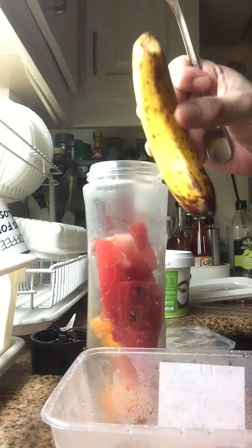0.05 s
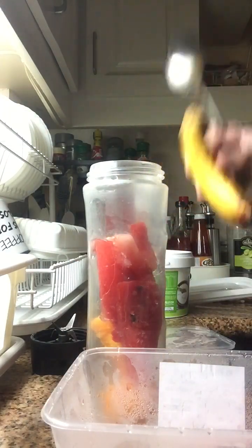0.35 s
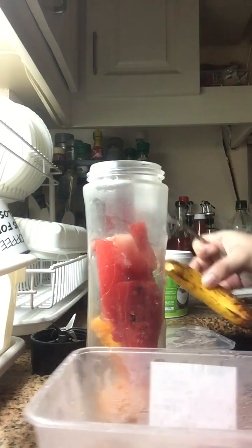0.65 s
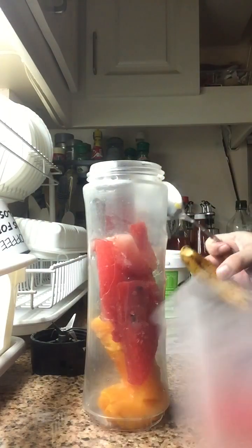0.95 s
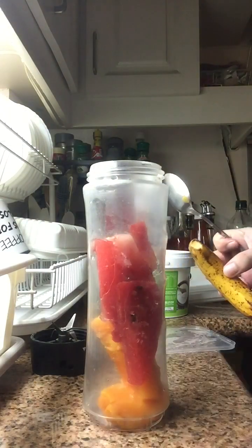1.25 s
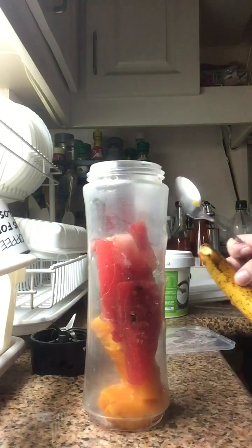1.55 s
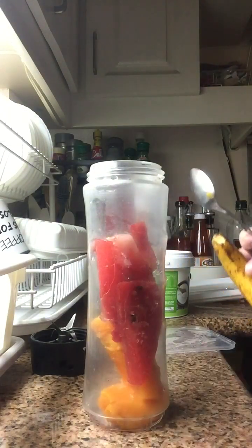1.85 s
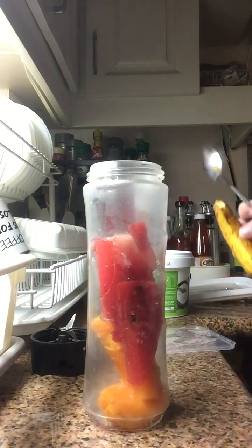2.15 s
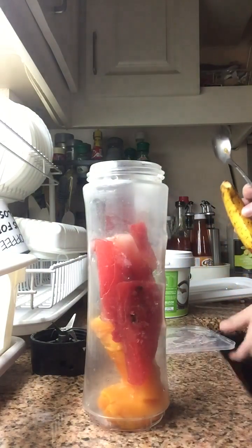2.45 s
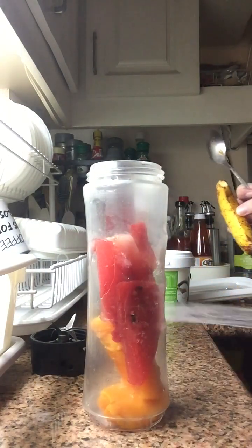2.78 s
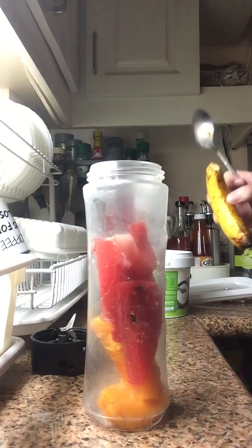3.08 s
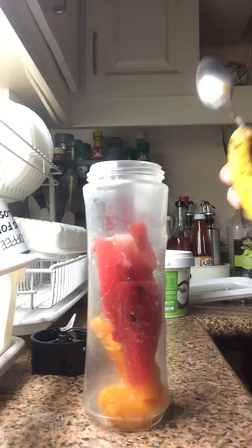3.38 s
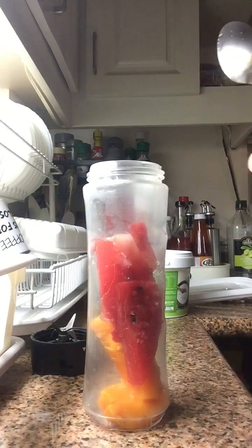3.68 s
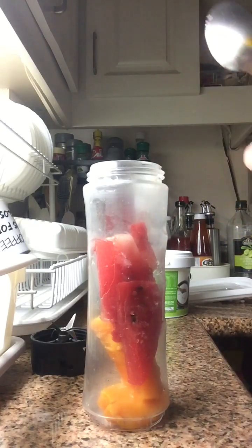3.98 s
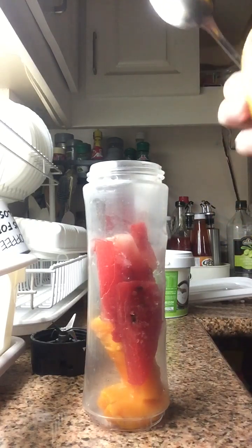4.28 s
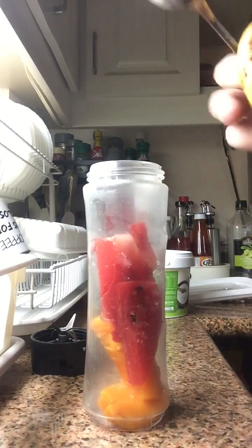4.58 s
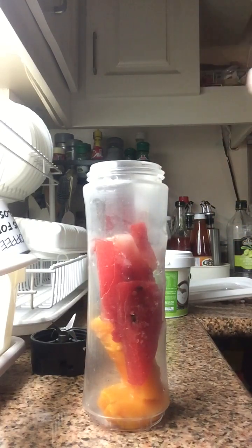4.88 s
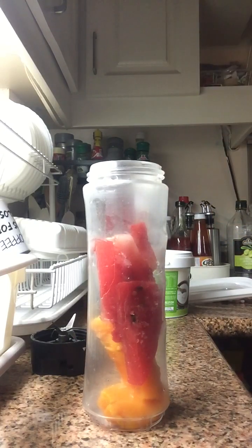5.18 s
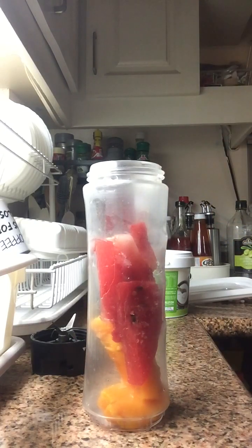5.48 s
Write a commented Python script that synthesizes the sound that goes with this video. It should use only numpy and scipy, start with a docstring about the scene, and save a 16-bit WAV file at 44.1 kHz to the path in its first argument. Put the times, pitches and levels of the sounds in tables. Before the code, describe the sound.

Close plastic scuffs, small clicks and dull knocks on a kitchen counter, then a drawer rasping shut and a few more knocks.

```python
"""A plastic tub scuffs over a kitchen worktop, close by, and squeaks by stick-slip friction.
A spoon and a banana tick and smack in one hand; things are put down with dull knocks that excite
the worktop's modes. Further off a drawer rasps along its runners and bumps home; the cabinet booms.
An appliance hums at first, over a low stir of handling and the faint hiss of the room."""
import sys
import numpy as np
from scipy import signal
from scipy.fft import rfft, irfft, next_fast_len
from scipy.io import wavfile

SR = 44100
rng = np.random.default_rng(int(sys.argv[2]) if len(sys.argv) > 2 else 0)


def wrap_up_sound(samples):
    """Save the sound to the file named by the first command line argument, as 16-bit audio."""
    columns = np.atleast_2d(samples).T
    # keep every value between -1 and 1, then stretch to whole-number steps
    tamed = np.clip(columns, -1, 1)
    steps = np.round(tamed * 32767).astype(np.int16)
    wavfile.write(sys.argv[1], SR, steps)


N = 243873
TIME = np.arange(N) / SR

# the tub rubs over the worktop: start_s, level_db, rise_s, t60_s, centre_hz, breadth_octaves
TUB_RUBS = [(0.024, -46, 0.029, 0.39, 2560, .8), (0.28, -61, 0.13, 0.52, 2580, 0.82),
            (0.470, -43, 0.024, 0.36, 1450, 1.34), (0.65, -61, 0.098, 1.0, 3000, 2.5),
            (0.831, -57.5, 0.065, 0.11, 3200, 3.9)]
# resonances and hollows of the tub: centre_hz, width_hz, boost_db
TUB_PEAKS = [(332, 74, 15), (581, 37, 12), (666, 280, -2.5), (1110, 70, -8), (3400, 300, 4.5)]
# harmonics 1 to 6 of the squeak: relative_db
SQUEAK_HARMONICS = [-5.5, -4.5, -5, -9, -19, -31]
# things put down: start_s, clatter_db, t60_s, tilt_db_per_octave, worktop_db, note_hz, note_db
KNOCK_EVENTS = [(0.881, -52.5, 0.14, -2.5, -58, 775, -41.5), (0.907, -43.5, 0.081, .5, -70, 1116, -35),
                (0.945, -50.5, 0.17, -3.5, -71, 873, -48), (1.048, -47, 0.1, 2.5, -64, 374, -45),
                (1.2654, -44.5, 0.081, -3.5, -52, 1560, -39), (1.274, -46, 0.13, -2.5, -52, 339, -28),
                (1.2938, -28.5, 0.036, 1.8, -51, 1172, -23.5), (1.300, -45.5, 0.26, 1.5, -62, 3210, -40),
                (1.358, -47, .09, 2.5, -56, 262, -36), (1.381, -65, 0.37, 10.5, -67, 5700, -61),
                (1.454, -43, 0.17, 0, -52.5, 975, -38), (1.757, -37, 0.26, 2, -39, 350, -23),
                (1.764, -32.5, .2, -1.5, -39.5, 552, -26), (3.7, -44.5, 0.2, -0.2, -39, 928, -29),
                (3.837, -44.5, .2, 5, -51, 2415, -39), (4.045, -56, .22, 0, -50, 1450, -53),
                (4.063, -50, 0.17, -3, -50.5, 766, -38.5), (4.184, -53.5, 0.23, 4.5, -48.5, 348, -36.5),
                (4.224, -62, 0.14, -4.5, -87, 348, -37)]
# spectrum shared by all knocks, a value per clatter band: relative_db
KNOCK_BANDS = [1, -0.5, -2, -0.5, -7.5, -11.5]
# edges of the six clatter bands: edge_hz
BAND_EDGES = np.array([40, 250, 700, 1600, 4000, 8000, 16000])
# modes of the worktop and what stands on it: pitch_hz, relative_db, t60_s
WORKTOP_MODES = [(145, -15, 0.14), (225.9, 7.5, 0.24), (348, 1, 0.12), (545.4, -8, 0.33),
                 (860.4, 0.5, 0.25), (900, -24.5, 0.38), (1567, -11, 0.35), (1840, -52, 0.17),
                 (1930, -5, 0.06), (2370, -12, .16), (3270, -14.5, 0.23)]
# hollows between those modes: centre_hz, width_hz, boost_db
WORKTOP_HOLLOWS = [(281, 27, -4.5), (483, 103, -6.5), (680, 110, 0.5), (1074, 200, -7.5), (2580, 870, -6)]
# soft heavy contacts: start_s, peak_db, pitch_hz
THUMP_EVENTS = [(1.06, -35, 120), (1.2721, -13, 113), (1.303, -19.5, 122.6), (1.461, -29, 96),
                (1.764, -25, 85), (1.921, -36.5, 94), (1.971, -39, 92.5), (3.018, -39, 72),
                (3.699, -21, 145), (4.063, -35.5, 94), (4.188, -36, 138), (4.877, -49.5, 109),
                (4.978, -48, 97)]
# ticks of fruit, spoon and plastic, and the drawer's latch cracking as it bumps home: start_s, peak_db,
# pitch_hz, quality_factor
TICK_EVENTS = [(0.733, -38, 4950, 0.89), (0.744, -43, 7000, 1), (0.908, -38.5, 1800, 1.1),
               (0.914, -32.5, 3400, 1.8), (0.924, -45, 3600, .8), (1.0388, -36, 6200, 1.8),
               (1.047, -32.5, 6200, 1), (1.055, -25, 2020, 5.1), (1.089, -26, 5700, 3),
               (1.069, -42, 4540, 1.3), (1.105, -34, 2740, 1.9), (1.146, -40, 2160, 16),
               (1.1761, -25, 7540, 1.6), (1.206, -38, 2660, 9.1), (1.361, -39, 6000, 4),
               (1.381, -28, 6300, 1.5), (1.438, -34, 6200, 3.5), (1.914, -44.5, 3680, 20),
               (2.6596, -9.5, 4500, 0.38), (3.012, -47, 1490, 18), (3.702, -26.5, 3730, 0.5),
               (4.0645, -45, 920, 2.1)]
# spells of crackling grit and peel: start_s, end_s, level_db
CRACKLE_SPELLS = [(0.6, 1.066, -49.5), (1.33, 1.537, -54)]
# spectra of the rolling drawer's rumble, rasp and hiss: frequency_hz, relative_db
RUMBLE_SPECTRUM = [(18, -50), (30, -65), (49, -2.5), (81, -17.5), (97, -11), (113, -37.5), (146, -9),
                   (270, -31.5), (300, -22), (390, -52), (660, -120)]
RASP_SPECTRUM = [(130, -43), (220, -4.5), (273, -4), (355, 0), (475, -15), (567, -4), (612, -14),
                 (829, -13.5), (1370, -9), (2330, -6.5), (2820, -9.5), (4330, -11.5), (4500, -23),
                 (5850, -65), (9900, -120)]
HISS_SPECTRUM = [(2240, -52), (3800, -13), (4390, -23), (4690, -1.5), (5480, -5), (8310, -15),
                 (9710, -12.5), (10500, -18.5), (16000, -31)]
# resonances and hollows of the drawer: centre_hz, width_hz, boost_db
DRAWER_PEAKS = [(96, 22, -7), (120, 14, 8), (181, 18, 4.5), (243, 40, 8.5), (345.6, 39, 11.5),
                (431, 17, 10), (492, 37, -1), (567.6, 14, 13), (746, 590, -9), (1150, 25, 8), (1300, 86, 3),
                (1470, 110, 3.5), (1670, 23, 6.5), (1850, 40, 4), (2014, 67, 4.5), (2350, 17, 6),
                (2760, 130, 3), (4370, 51, 6), (6200, 900, 1.5), (7800, 1400, -2.5), (11100, 1200, 8.5)]
# the drawer's bump, a value per clatter band: level_db
BUMP_BANDS = [-25.5, -29, -24.5, -29, -33, -42.5]
# spectra of the cabinet's boom, the stir of handling and the room hiss: frequency_hz, relative_db
BOOM_SPECTRUM = [(25, -2), (48, 0.5), (72, 8.5), (95, -10), (122, 3.5), (170, -9.5), (300, -62)]
STIR_SPECTRUM = [(25, -6), (60, -2.5), (110, 11), (200, -2), (500, -19), (1500, -12), (5000, -31.5),
                 (15000, -43.5)]
AIR_SPECTRUM = [(15, -63), (25, -17), (45, -12.5), (117, -3), (180, -6), (200, -12.5), (236, -6),
                (384, -15.5), (427, -9), (476, -18), (734, -21), (1440, -20), (2280, -25), (7110, -34),
                (16000, -33)]
# peaks in the room hiss: centre_hz, width_hz, boost_db
AIR_PEAKS = [(1450, 215, 7), (2970, 29, 10.5), (3300, 100, 0), (6300, 3800, 4), (8070, 1800, 3.5)]
# reverberation time, set by absorption at the walls: frequency_hz, t60_s
ROOM_DECAY = [(100, 1.0), (400, 0.92), (2000, 0.45), (6000, 0.19), (14000, 0.32)]
# microphone response: frequency_hz, gain_db
MIC_RESPONSE = [(4300, -1), (4900, -5.5), (5600, -1.5), (6700, -1.0), (7400, -2.5), (8500, -5.5),
                (9600, -3.5), (10200, -9), (11300, -5.5), (12500, -6.0), (15500, -8)]

BAND_HZ = np.sqrt(BAND_EDGES[1:] * BAND_EDGES[:-1])


def tub_scuffs():
    """Sliding friction: plastic on stone makes grainy noise, coloured by the tub's resonances."""
    out = np.zeros(N)
    edge_db = -7   # one breadth away from the centre
    for start, db, rise, t60, centre_hz, breadth in TUB_RUBS:
        band_db = db + edge_db * (np.log2(BAND_HZ / centre_hz) / breadth) ** 2
        add(out, start, clatter(rise, t60, band_db, grain_db=2, damping_hz=8900, peaks=TUB_PEAKS))
    return out


def tub_squeak():
    """Stick-slip oscillation: the tub grips and lets go almost periodically, in a hoarse rising tone."""
    start_s, end_s, start_hz, glide_hz_per_s = 0.30, 0.47, 1032, 1600
    hz = start_hz + glide_hz_per_s * (np.clip(TIME, start_s, end_s) - start_s)
    phase = wavering_phase(hz, jitter=0.032, rate_hz=700)
    squeak = 0
    for harmonic, db in enumerate(SQUEAK_HARMONICS, 1):
        flutter = from_db(db + 0.6 * drift(16))
        rasp = 1 + 0.65 * drift(350)
        squeak = squeak + flutter * rasp * np.sin(harmonic * phase)
    return from_db(-55) * during(start_s, end_s) * rms_one(squeak)


def knocks():
    """Impact excites free vibration: a short clatter, the thing's own note and the worktop's modes."""
    out, t = np.zeros(N), TIME[:SR // 2]
    octaves_up = np.log2(np.minimum(BAND_HZ, 3000) / 1000)   # the tilt levels off above 3 kHz
    for start, clatter_db, t60, tilt, worktop_db, note_hz, note_db in KNOCK_EVENTS:
        rise = 0.0044 * (t60 / 0.2) ** 1.53   # a drier knock also starts more sharply
        band_db = clatter_db + np.array(KNOCK_BANDS) + tilt * octaves_up
        contact = clatter(rise, t60, band_db, grain_db=-0.5, damping_hz=14900, peaks=WORKTOP_HOLLOWS)
        add(out, start, contact)
        ring = 0
        for hz, db, mode_t60 in WORKTOP_MODES:
            envelope = from_db(db + 0.5 * rng.standard_normal() - 60 * t / mode_t60)
            ring = ring + envelope * np.sin(2 * np.pi * (hz * t + rng.random()))
        note = from_db(note_db - 60 * t / (0.6 * t60)) * np.sin(2 * np.pi * note_hz * t)
        add(out, start, (from_db(worktop_db) * ring + note) * np.minimum(t / rise, 1))
    return out


def thumps():
    """Damped oscillation: a soft contact pushes the worktop through two or three low swings."""
    out, t = np.zeros(N), TIME[:SR // 5]
    for start, db, hz in THUMP_EVENTS:
        cycles = hz * t
        swell = (cycles * np.exp(1 - cycles)) ** 4   # peaks after one cycle
        add(out, start, from_db(db) * swell * np.sin(2 * np.pi * cycles))
    return out


def ticks():
    """Cavity resonance: a sticky film or a hard edge snaps, and the burst rings a small hollow."""
    out, t = np.zeros(N), TIME[:SR // 20]
    t60_s = 0.012
    soften = signal.butter(3, 13500, fs=SR, output="sos")
    for start, db, hz, q in TICK_EVENTS:
        snap = signal.sosfilt(soften, rng.standard_normal(len(t)) * from_db(-60 * t / t60_s))
        tick = signal.lfilter(*signal.iirpeak(hz, max(q, 0.5), fs=SR), snap)
        add(out, start, from_db(db) * tick / np.abs(tick).max())
    return out


def crackle():
    """Shot noise: grit under the tub and peel in the hand snap in lone grains of random strength."""
    grains_per_s, spread_db = 160, 4
    pressure = sum(from_db(db) * np.sin(np.pi * np.clip((TIME - start) / (end - start), 0, 1))
                   for start, end, db in CRACKLE_SPELLS)
    snaps = rng.random(N) < grains_per_s / SR
    sizes = pressure * from_db(spread_db * np.minimum(rng.exponential(1, N), 2))
    impulses = snaps * sizes * rng.choice([-1, 1], N)
    grain = rng.standard_normal(SR // 200) * np.exp(-TIME[:SR // 200] / 0.00064)
    grains = np.convolve(impulses, grain / np.abs(grain).max())[:N]
    treble = signal.butter(2, (2500, 11300), "band", fs=SR, output="sos")
    return signal.sosfilt(treble, grains + 1e-18)


def drawer_roll():
    """Friction slows the shoved drawer to a creep; its runners rasp and its panel drones with speed."""
    shove_s, rise_s, glide_s, stop_s = 2.2815, 0.081, 0.039, 2.64
    friction_db_per_s, creep_db = 130, -19.5   # both act on speed, which is about 1 at its fastest
    age = TIME - shove_s
    slowing = from_db(-friction_db_per_s * np.maximum(age - rise_s - glide_s, 0))
    speed = np.clip(age / rise_s, 0, 1) * np.hypot(slowing, from_db(creep_db)) * during(shove_s, stop_s)
    panel = from_db(-26) * np.sqrt(2) * np.sin(wavering_phase(hz=114.3, jitter=0.01, rate_hz=29))
    rumble = from_db(-28.5) * noise(RUMBLE_SPECTRUM)
    upper_peaks = [peak for peak in DRAWER_PEAKS if peak[0] > 1000]
    rasp = from_db(-33.5) * speed ** 1.05 * noise(RASP_SPECTRUM, peaks=upper_peaks)
    hiss = from_db(-43) * speed ** 1.3 * noise(HISS_SPECTRUM)
    flicker = from_db(1.4 * drift(210))
    return speed * (panel + rumble) + (rasp + hiss) * flicker


def drawer_bump():
    """Impact and resonance: the drawer hits its stop and rattles, and the cabinet booms on."""
    out, t = np.zeros(N), TIME[:SR]
    rattle = clatter(rise=0.041, t60=0.49, band_db=BUMP_BANDS, grain_db=0, damping_hz=9700,
                     peaks=DRAWER_PEAKS)
    add(out, 2.633, rattle)
    rise_s, t60_s = 0.08, 0.86
    boom = np.minimum(t / rise_s, 1) * from_db(-30 - 60 * np.maximum(t - rise_s, 0) / t60_s)
    add(out, 2.659, boom * noise(BOOM_SPECTRUM, size=SR))
    return out


def appliance_hum():
    """A tone modulated in pitch and level: the appliance's hum wavers, sags and then dies away."""
    start_hz, glide_hz_per_s, off_s = 128.1, 3.065, 1.93
    start_db, sag_db_per_s, release_db_per_s = -49.5, 4, 45
    hz = start_hz + glide_hz_per_s * np.minimum(TIME, off_s)
    db = start_db - sag_db_per_s * TIME - release_db_per_s * np.maximum(TIME - off_s, 0)
    tone = np.sqrt(2) * np.sin(wavering_phase(hz, jitter=0.014, rate_hz=25.2))
    return tone * from_db(db + 2.2 * drift(25.2))


def reverberation(x):
    """Diffuse reflection: a small hard room adds a nearly colourless tail of unit energy."""
    t = TIME[:SR * 3 // 4]
    reflections = rng.standard_normal(len(t)) * np.exp(-t / 0.096)
    # a flat spectrum: the modes lie so close that none stands out
    phase = np.angle(rfft(reflections, 2 * len(t)))
    even = irfft(np.exp(1j * phase))[:len(t)]
    tail = sum(band * from_db(-60 * t / at_hz(ROOM_DECAY, hz)) for hz, band in octaves(even))
    tail *= t > 0.004   # delay of the first reflection
    return signal.fftconvolve(x, tail / np.linalg.norm(tail))[:N]


def background():
    """Broadband noise: the low stir of handling settles over the steady hiss of the room."""
    fade_db_per_s = 5
    stir = from_db(-50.5 - fade_db_per_s * TIME) * noise(STIR_SPECTRUM)
    hiss = from_db(-59.5) * noise(AIR_SPECTRUM, peaks=AIR_PEAKS)
    return stir + hiss


def clatter(rise, t60, band_db, grain_db, damping_hz, peaks=()):
    """Modal damping: many small contacts excite dense modes, which swell and die, treble first."""
    t = TIME[:SR * 3 // 4]
    density_db = np.array(band_db) - 10 * np.log10(np.diff(BAND_EDGES))
    spectrum = [(25, density_db[0] - 10), *zip(BAND_HZ, density_db), (BAND_EDGES[-1], density_db[-1] - 9)]
    body = noise(spectrum, size=len(t), peaks=peaks) * np.linalg.norm(from_db(band_db))
    grain = rms_one(from_db(grain_db * drift(574, size=len(t))))
    decay_db = -60 * np.maximum(t - rise, 0) / t60
    dying = sum(band * from_db(decay_db * np.hypot(1, hz / damping_hz)) for hz, band in octaves(body))
    swell = np.sin(np.pi / 2 * np.minimum(t / rise, 1)) ** 2
    return dying * grain * swell


def noise(spectrum, size=N, peaks=()):
    """Fourier synthesis: random phases give unit-rms noise with a set spectrum and resonances."""
    padded = next_fast_len(size, True)
    hz = np.fft.rfftfreq(padded, 1 / SR)
    gain = from_db(at_hz(spectrum, hz)) * hz / np.hypot(hz, 20)
    for centre, width, boost_db in peaks:
        gain = gain * from_db(boost_db / (1 + (2 * (hz - centre) / width) ** 2))
    return rms_one(irfft(gain * np.exp(2j * np.pi * rng.random(len(hz))), padded)[:size])


def octaves(x):
    """Superposition: overlapping octave bands that sum to the sound, as (centre_hz, band) pairs."""
    spectrum, centres = rfft(x), 62.5 * 2. ** np.arange(9)
    hz = np.fft.rfftfreq(len(x), 1 / SR)
    return [(c, irfft(spectrum * at_hz(np.c_[centres, centres == c], hz), len(x))) for c in centres]


def wavering_phase(hz, jitter, rate_hz):
    """Frequency modulation: phase is the integral of a pitch that wanders by the fraction jitter."""
    return 2 * np.pi * np.cumsum(hz * (1 + jitter * drift(rate_hz))) / SR


def drift(rate_hz, size=N):
    """Interpolated random values: a wandering of unit rms."""
    steps = rng.standard_normal(4000)
    return rms_one(np.interp(TIME[:size] * rate_hz, np.arange(len(steps)), steps))


def during(start, end):
    """A gate: one between two times, with 20 ms ramps outside them."""
    return np.clip(np.minimum(TIME - start, end - TIME) / 0.02 + 1, 0, 1)


def add(out, start_s, sound):
    """Superpose a sound at a given time."""
    start = max(int(start_s * SR), 0)
    out[start:start + len(sound)] += sound[:N - start]


def at_hz(points, hz):
    """Interpolate a table on a log-frequency axis."""
    table_hz, value = np.transpose(points)
    return np.interp(np.log(np.maximum(hz, 1)), np.log(table_hz), value)


def from_db(db):
    """Decibels to amplitude ratio."""
    return 10 ** (np.asarray(db) / 20)


def rms_one(x):
    """Normalise to unit rms."""
    return x / np.sqrt(np.mean(x ** 2) + 1e-20)


def scene():
    """Direct and reverberant fields add for near sounds; drawer and background are already diffuse."""
    small = ticks() + tub_scuffs() + tub_squeak() + crackle()
    blows = knocks() + thumps()
    room = reverberation(from_db(-8) * small + from_db(-17) * blows)
    return (small + blows + room + drawer_roll() + drawer_bump() + appliance_hum() + background())[None]


def record(dry):
    """Frequency response: the microphone softens the treble, dips near 10 kHz and cuts the top."""
    cutoff_hz = 15900
    hz = np.fft.rfftfreq(2 * N, 1 / SR)
    heard = irfft(rfft(dry, 2 * N) * from_db(at_hz(MIC_RESPONSE, hz)), 2 * N)[:, :N]
    return signal.sosfilt(signal.ellip(10, 0.2, 70, cutoff_hz, fs=SR, output="sos"), heard)


dry = scene()
out = record(dry)
wrap_up_sound(out)
```